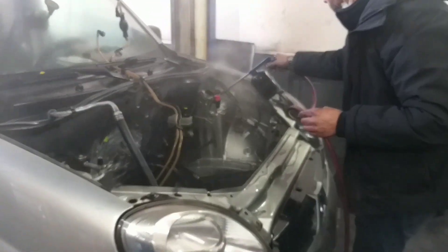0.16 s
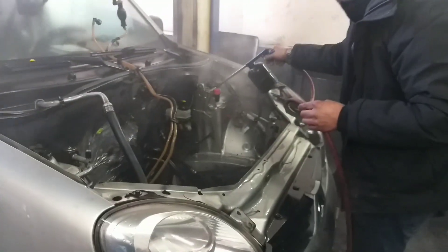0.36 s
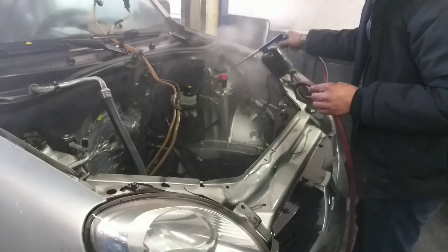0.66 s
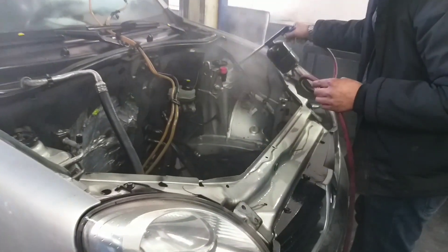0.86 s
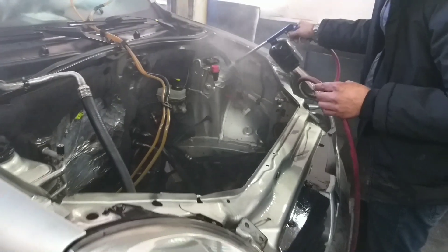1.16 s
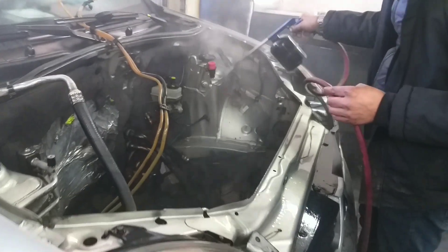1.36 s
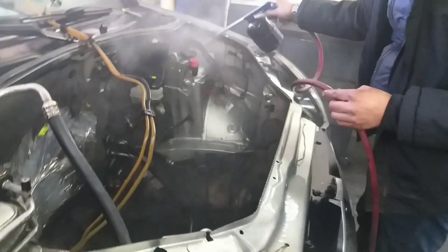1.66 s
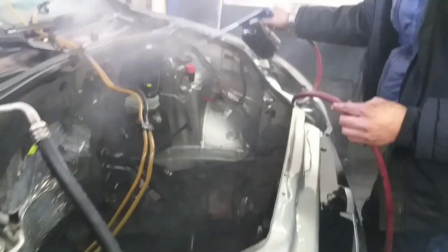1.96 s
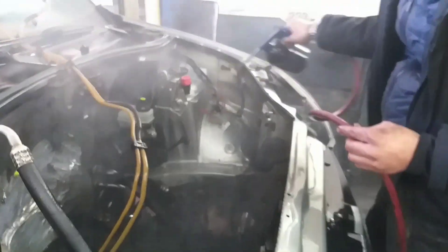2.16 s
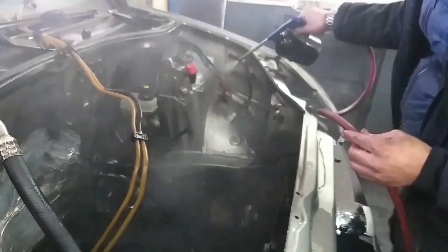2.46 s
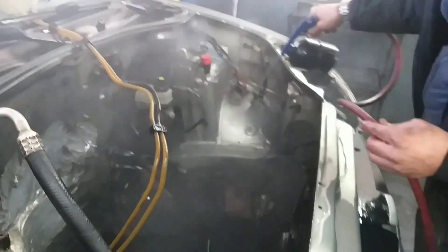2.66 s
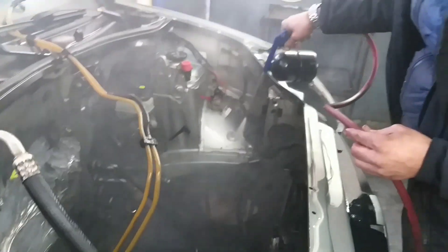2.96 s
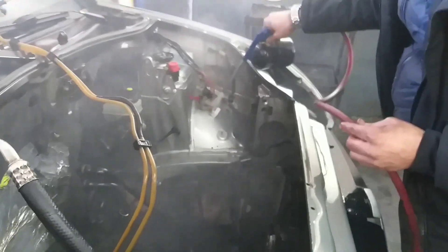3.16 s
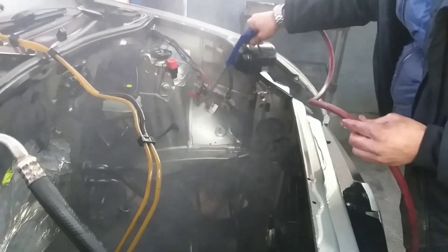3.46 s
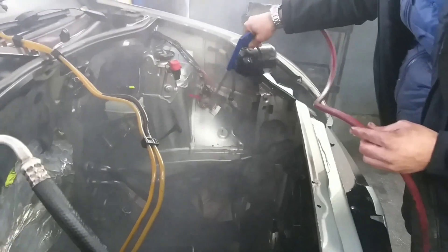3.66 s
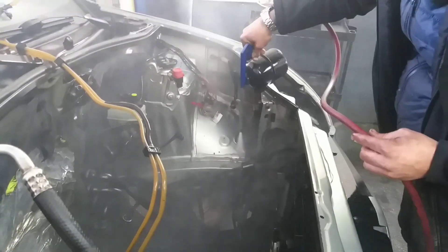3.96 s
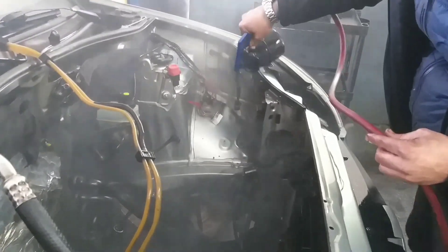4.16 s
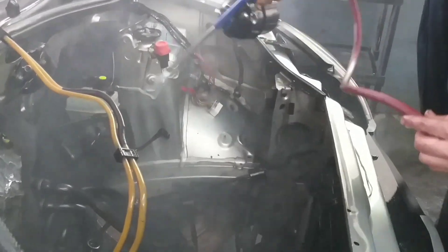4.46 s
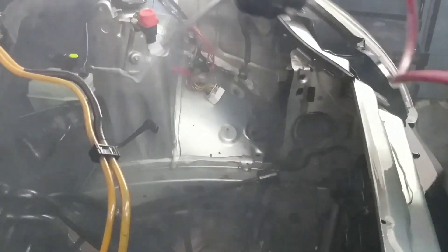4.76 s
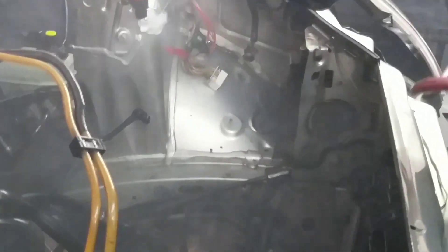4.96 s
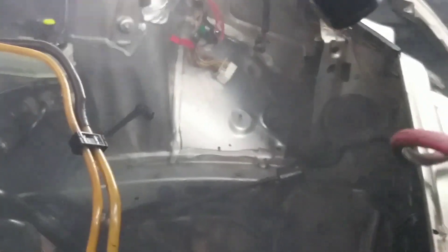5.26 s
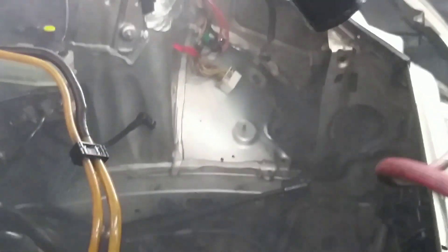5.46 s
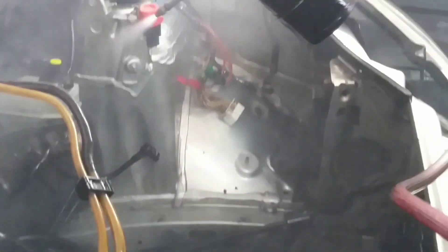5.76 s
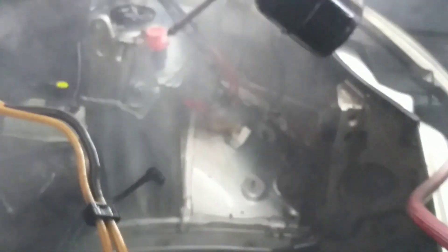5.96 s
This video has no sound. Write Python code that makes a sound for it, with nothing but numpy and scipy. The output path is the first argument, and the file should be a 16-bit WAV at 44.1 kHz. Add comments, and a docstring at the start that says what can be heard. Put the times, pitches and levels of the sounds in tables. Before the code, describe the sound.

The jet is already at full force at 0 s: a loud, dense, high hiss strongest around 9 kHz, with wet sizzling around 4 to 6 kHz, heard close in a garage. From 0.1 to 1.7 s it flickers quickly as spray strikes panels, with short drumming surges, small spurts and faint noisy whistles over edges. Around 2.1 to 2.4 s the hits swell again. From about 2.6 s the gun turns downward; the hiss becomes slightly lower and more peaked, with extra airy mist until 4 s. Drumming pulses near 2.9 to 3.2 s, and a soft hollow rush comes at 4 s. From 4.3 to 5.1 s it eases slightly between spurts, misses and hits. Hollow puffs follow at 5.2 to 5.5 s, then a sizzling surge at 5.6 s. Faint splashing, air rumble and nearly buried motor hum continue underneath; the hiss runs to the end at about 6.1 s.

```python
"""A hot-water washer gun sprays steam into an empty engine bay in a garage, heard close by in near mono.
The nozzle is shaped noise whose peak slides with its aim. The jet's noise and drops sizzle and drum on metal.
Narrow noise bands whistle over edges and a low band rushes into hollows.
Behind it run-off splashes, low air noise rumbles and buffets, and a faint sine motor hum dips and climbs."""
import sys
import numpy as np
from scipy import signal
from scipy.fft import rfft, irfft, next_fast_len
from scipy.io import wavfile
from scipy.ndimage import uniform_filter1d, minimum_filter1d, map_coordinates

SR = 44100
rng = np.random.default_rng(int(sys.argv[2]) if len(sys.argv) > 2 else 0)


def wrap_up_sound(samples):
    """Save the sound to the file named by the first command line argument, as 16-bit audio."""
    columns = np.atleast_2d(samples).T
    # keep every value between -1 and 1, then stretch to whole-number steps
    tamed = np.clip(columns, -1, 1)
    steps = np.round(tamed * 32767).astype(np.int16)
    wavfile.write(sys.argv[1], SR, steps)


N = 269892

# Levels over time come before the trims and flickers that each source adds.
# Spectra give relative level per Hz. Resonance widths are from the centre to -6 dB.

# Slow path of the gun round the bay: [t/s, nozzle hiss level/dB, sizzle level/dB, drumming level/dB]
GUN_SWEEP = [(0, -16, -21.5, -29), (.07, -15.5, -22.5, -30.5), (.16, -14.5, -20, -29),
             (.62, -13.5, -20, -29.5), (.88, -13.5, -20, -33), (1.08, -15, -21.5, -32),
             (1.8, -15, -24, -34), (2.25, -13.7, -22, -34.5), (2.55, -15, -22.5, -36),
             (3.1, -16.5, -21.5, -36.5), (3.7, -16, -19, -35.5), (4.15, -16.5, -22, -36),
             (4.5, -18, -23, -36.5), (4.95, -17.5, -23.5, -36.5), (5.2, -16.5, -23, -32),
             (5.43, -17, -24.5, -34), (5.62, -15, -18, -31), (6.12, -16, -23, -39)]
# Peak of the nozzle spectrum: [t/s, f/Hz]
NOZZLE_PEAK = [(0, 8900), (.45, 8800), (.95, 9260), (1.6, 9150), (2.35, 9070), (2.6, 9000), (2.85, 8530),
               (3.4, 8600), (3.85, 8420), (4.25, 8480), (4.6, 8600), (5.45, 8700), (6.12, 8600)]
# Turning of the gun: [t/s, side-on share 0-1, fine mist level/dB]
GUN_TURN = [(0, 0.47, -36), (.2, 0.77, -28), (1.2, 0.7, -30), (2.3, 0.84, -29), (2.7, 0.4, -23),
            (3.1, 0.24, -23), (3.6, 0.2, -21), (4.2, 0.1, -26), (4.6, 0.15, -27), (5.3, 0.2, -29),
            (5.7, 0.12, -32), (6.12, 0.2, -24)]
# Nozzle hiss with the gun seen side-on: [f/Hz, level/dB]
HISS_SIDE_ON = [(3000, -53), (5500, -4), (6600, -11.5), (8000, -3.5), (8700, -2), (9200, 4.5), (10100, 1.5),
                (11300, 1), (12500, 1), (13800, -3.5), (16000, -11)]
# Nozzle hiss with the gun pointing down into the bay: [f/Hz, level/dB]
HISS_DOWNWARD = [(3000, -66), (5500, -6.5), (6400, -8), (7500, -1), (8100, 2), (8550, 5), (9200, -1),
                 (9900, -15.5), (10700, -11.5), (11700, -4.5), (13500, -3.5), (16000, -7)]
# Finest hiss of the steam: [f/Hz, level/dB]
MIST_SPECTRUM = [(11000, -28), (13500, -2), (14500, 3), (15400, 9), (16000, -8)]
# Gun spits harder and throws a puff of air: [t/s, length/s, change of hiss level/dB]
SPURT_EVENTS = [(.535, 0.054, 2.5), (.79, 0.1, 1), (1.47, .06, 1), (1.76, .05, 1.4), (2.32, .07, 0),
                (3.15, 0.052, 2.5), (3.43, 0.071, 2), (3.86, 0.04, 1), (4.315, 0.045, 2.3),
                (4.47, .05, -0.5), (4.62, 0.046, 0.5), (4.79, 0.046, 2.5), (5.02, 0.042, 1),
                (5.87, 0.084, 2)]
# Jet lands squarely on a panel: [t/s, length/s, change of sizzle level/dB, change of drumming level/dB]
PANEL_HITS = [(.14, 0.047, 3.5, 3.5), (.26, 0.12, 4, 2), (.365, 0.11, 2.5, 3.5), (.555, 0.1, 4.5, 3),
              (.715, 0.053, 0, 4.5), (.96, 0.047, -0.5, 6), (1.045, .04, 2.5, -1.5), (1.215, .09, 3, 6.5),
              (1.425, .06, 3, 7), (1.63, .08, 2.5, 0.5), (2.14, 0.14, 3.5, 4.5), (2.34, .11, 4, 2.5),
              (2.61, 0.082, -1.5, 4.5), (2.77, 0.056, 1.5, 4), (2.905, .06, 2, 7.5), (3.15, 0.065, 0, 7.5),
              (3.235, 0.031, 1, 7), (3.31, .05, 1.5, -1), (4.26, 0.051, 2, 6.5), (4.495, .06, 2, 2.5),
              (4.745, .04, 4.5, 3.5), (4.805, 0.045, 4, 6), (5.025, .07, 3.5, 1.5),
              (5.68, 0.088, 1.5, -2.5), (5.8, .05, -0.5, 0), (6.075, 0.065, 4, 3)]
# Jet slips past the metal into a gap: [t/s, length/s, drop of impact level/dB]
GAP_MISSES = [(.46, 0.054, 0), (.85, 0.076, 3), (1.33, .08, 2), (1.49, .03, -1), (4.4, 0.049, 4.5),
              (4.555, .03, 1), (4.69, 0.049, 3.5), (4.93, .09, 2.5), (5.99, 0.037, 0)]
# Sizzle of the jet sweeping across the bay: [f/Hz, level/dB]
SIZZLE_SWEEPING = [(1500, -45), (2900, -13.5), (3350, -8), (3750, -15.5), (4150, 1), (4600, -1.5),
                   (5000, 1.5), (5400, 0.5), (5850, -1), (6300, -4), (7200, -6), (10000, -39)]
# Sizzle of the jet pointing down into the bay: [f/Hz, level/dB]
SIZZLE_DOWNWARD = [(1500, -35), (3000, -24.5), (3400, -7), (3800, -2), (4250, -1.5), (4600, 1.5),
                   (5000, -1), (5400, -1), (5850, -4), (6250, -10), (7200, -6), (10000, -30)]
# Panel resonances: [f/Hz, width/Hz, level/dB]
PANEL_MODES = [(1020, 250, -16), (1700, 430, -4.5), (2024, 460, -1), (2603, 270, 2), (3030, 300, 1),
               (3430, 330, 3.5), (4110, 570, 3.5)]
# Jet sings over an edge or a hole: [t/s, length/s, f/Hz, full width at -6 dB/Hz, level/dB]
EDGE_WHISTLES = [(0.195, .035, 5050, 350, -24), (0.257, .03, 4100, 600, -24), (0.383, 0.02, 5800, 650, -18),
                 (.42, .06, 11300, 400, -27), (0.45, 0.035, 5050, 260, -26), (0.544, 0.039, 4350, 500, -22),
                 (0.576, .025, 5240, 400, -22), (.70, 0.042, 5540, 450, -22),
                 (0.706, 0.041, 6900, 700, -24), (1.195, 0.024, 5000, 350, -19),
                 (1.87, .07, 13300, 400, -29), (2.075, .025, 5080, 350, -21.5),
                 (2.144, 0.038, 5970, 900, -26), (2.15, 0.045, 3630, 600, -28), (3.47, .08, 7750, 350, -27),
                 (3.62, .05, 10100, 350, -30), (3.732, .07, 7490, 350, -24.5),
                 (4.783, 0.042, 4450, 380, -23), (4.793, .05, 11500, 600, -28),
                 (5.019, .035, 3830, 480, -26)]
# Jet dips into a hollow of the body: [t/s, length/s, level/dB]
HOLLOW_DIPS = [(0.07, 0.066, -36), (0.532, 0.037, -31), (4.02, 0.15, -32.5), (4.245, 0.11, -41.5),
               (5.168, 0.045, -34.5), (5.279, 0.087, -40.5), (5.41, 0.042, -34), (5.463, 0.047, -30)]
# Resonances of the hollows: [f/Hz, width/Hz, level/dB]
CAVITY_MODES = [(680, 83, -2.5), (786, 150, -5.5), (1010, 100, 2), (1200, 160, -1), (1760, 350, -0.5)]
# Draught and run-off over time: [t/s, air rumble level/dB, splashing level/dB]
DRAUGHT_AND_RUNOFF = [(0, -55, -34.5), (.17, -45, -38.5), (.78, -43.5, -37), (1.12, -46.5, -41.5),
                      (2.35, -44, -39), (2.9, -48, -42), (3.3, -52.5, -44), (3.75, -48.5, -48),
                      (4.0, -47.5, -39), (4.23, -54.5, -44), (4.5, -48, -44), (5.1, -53, -45.5),
                      (5.4, -51, -40), (5.85, -49, -44), (6.12, -45, -44)]
# Rumble of the stirred air: [f/Hz, level/dB]
RUMBLE_SPECTRUM = [(40, -45), (70, -11), (105, -3), (150, -3.5), (250, -1), (400, -3.5), (700, -14.5),
                   (1500, -52)]
# Deep buffeting of the air: [f/Hz, level/dB]
BUFFET_SPECTRUM = [(10, -40), (25, -14), (35, -6), (50, 1), (80, 4), (120, -3), (200, -28)]
# Splashing run-off water: [f/Hz, level/dB]
SPLASH_SPECTRUM = [(150, -29), (400, -6.5), (700, 0), (1050, 1.5), (1400, -1), (2200, -1.5), (4000, -39)]
# Motor hum: [t/s, f/Hz, level/dB]
MOTOR_HUM = [(0, 110, -63), (2.4, 104.7, -61), (2.85, 112, -58), (3.4, 110, -69), (3.72, 103, -53),
             (3.88, 92.6, -66), (4.45, 100, -62), (4.85, 109, -57.5), (5.2, 115, -50), (5.53, 121, -53),
             (5.68, 122, -70), (6.12, 120, -69)]
# Two resonances, leaning left and right, that open up the stereo image: [f/Hz, width/Hz, level/dB]
STEREO_MODES = [(1870, 98, -19), (9270, 220, -8.5)]

HISS_PER_SIZZLE, SPLASH_PER_DRUM = 0.2, 0.14  # dB gained by hiss and splashing per dB of impact
AIR_PER_SPURT = 1.9  # dB of rumble per dB of spurt
BUFFET_DB, BUFFET_AT_DB = -63.5, -47.5  # buffet level, and the rumble curve's level where it applies
BUFFET_GROWS = 1.85  # dB of buffet per dB of rumble
MIST_PATCHY_DB = 2  # unevenness of the finest hiss
DROPS_PER_S, DROP_SPREAD_DB = 1500, 2  # drops in the jet and their scatter in strength
SPUTTER_PER_S = 80  # random knots a second in the jet's flicker
TOP_HZ = 15780  # nothing is left from here up


def amp(db):
    """Decibels to gain."""
    return 10 ** (np.asarray(db) / 20)


def unit(x):
    """Scale to rms 1."""
    return x / np.sqrt(np.mean(x ** 2) + 1e-20)


def clock():
    """The time of every sample in seconds."""
    return np.arange(N) / SR


def curves(rows):
    """One value per sample for each column after the time."""
    s, *cols = np.transpose(rows)
    return [np.interp(clock(), s, col) for col in cols]


def swell(s, length):
    """A smooth bell-shaped rise and fall around time s."""
    return np.exp(-2 * ((clock() - s) / length) ** 2)


def passes(rows):
    """For each dB column after time and length, the sum of round-shouldered plateaus."""
    s, length, *cols = np.transpose(rows)
    offset = 2 * (clock() - s[:, None]) / length[:, None]
    shapes = 1 / (1 + offset ** 4)  # length spans the half-height points
    return [db @ shapes for db in cols]


def wobble(rate):
    """A smooth random curve, rate knots a second."""
    knots = rng.standard_normal(int(N * rate / SR) + 4)
    return map_coordinates(knots, [clock() * rate])


def colour(points):
    """The response through (Hz, dB) points on a log frequency axis."""
    f, db = np.transpose(points)
    return lambda hz: amp(np.interp(np.log(hz + 1), np.log(f), db))


def resonances(modes):
    """The response of (Hz, width, dB) modes with steep skirts, summed in power."""
    return lambda hz: np.sqrt(sum(amp(db) ** 2 / (1 + ((hz - c) / w) ** 2) ** 2 for c, w, db in modes))


def filtered(x, response):
    """x shaped by a response over frequency."""
    m = next_fast_len(N + SR // 4)
    return irfft(rfft(x, m) * response(np.fft.rfftfreq(m, 1 / SR)), m)[..., :N]


def turbulence(patchy_db, patch_hz=300, patch_s=.06):
    """White noise whose strength varies in patches of time and frequency."""
    hz, t, z = signal.stft(rng.standard_normal(N), SR, nperseg=1024)
    rows, cols = np.meshgrid(hz / patch_hz, t / patch_s, indexing="ij")
    patches = map_coordinates(rng.standard_normal((400, 420)), [rows, cols], order=1)
    return signal.istft(z * amp(patchy_db * unit(patches)), nperseg=1024)[1][:N]


def drops(rate, spread_db):
    """Random clicks of either sign, mostly weak and a few strong."""
    falls = rng.random(N) < rate / SR
    size = np.minimum(rng.standard_exponential(N), 5)
    return unit(falls * amp(spread_db * size) * rng.choice([-1, 1], N))


def aimed(spectrum, peak_hz):
    """Nozzle noise whose spectrum slides so that its highest point sits at peak_hz."""
    noise = turbulence(patchy_db=1.5, patch_hz=260, patch_s=.06)
    hz, t, z = signal.stft(noise, SR, nperseg=512)
    own_peak_hz = max(spectrum, key=lambda point: point[1])[0]
    slide = own_peak_hz / np.interp(t, clock(), peak_hz)
    shaped = z * colour(spectrum)(hz[:, None] * slide)
    return unit(signal.istft(shaped, nperseg=512)[1][:N])


def nozzle(hiss_db):
    """Escaping steam hisses; turning the gun crossfades two colours, slides their peak and varies the mist."""
    peak_hz, = curves(NOZZLE_PEAK)
    share, mist_db = curves(GUN_TURN)
    share = np.clip(share, 0, 1)
    side_on = np.sqrt(share) * aimed(HISS_SIDE_ON, peak_hz)
    downward = np.sqrt(1 - share) * aimed(HISS_DOWNWARD, peak_hz)
    mist = unit(filtered(turbulence(patchy_db=MIST_PATCHY_DB), colour(MIST_SPECTRUM)))
    hiss_gain = amp(hiss_db - 0.04 + 0.53 * wobble(70))
    return hiss_gain * (side_on + downward) + amp(mist_db + 1.5) * mist


def impact(sizzle_db, drum_db):
    """The sputtering jet and its drops excite sheet metal: a bright sizzle and resonant panel drumming."""
    share = np.clip(curves(GUN_TURN)[0], 0, 1)
    sputter = wobble(SPUTTER_PER_S)
    patter = drops(rate=DROPS_PER_S, spread_db=DROP_SPREAD_DB)
    spray = turbulence(patchy_db=2.0, patch_hz=256, patch_s=.035) + 0.54 * patter
    across = unit(filtered(spray, colour(SIZZLE_SWEEPING)))
    down = unit(filtered(spray, colour(SIZZLE_DOWNWARD)))
    sizzle = share * across + (1 - share) * down
    pressure = turbulence(patchy_db=2.0, patch_hz=180.8, patch_s=0.066) + .5 * patter
    drum = unit(filtered(pressure, resonances(PANEL_MODES)))
    sizzle_gain = amp(sizzle_db + 0.5 + 1.0 * sputter)
    drum_gain = amp(drum_db + 3.5 + 0.52 * sputter)
    return sizzle_gain * sizzle + drum_gain * drum


def edges():
    """Brief narrow bands of noise whistle where the jet is split by an edge."""
    flow = rng.standard_normal(N)
    whistles = np.zeros(N)
    for s, length, hz, width, db in EDGE_WHISTLES:
        tone = unit(filtered(flow, resonances([(hz, width / 2, 0)])))
        whistles += amp(db + 4.0) * swell(s, length) * tone
    return whistles


def hollows():
    """Turbulence excites cavity resonances: a low rush each time the jet blows into a recess."""
    blow = sum(amp(db) * swell(s, length) for s, length, db in HOLLOW_DIPS)
    rush = filtered(turbulence(patchy_db=3.0, patch_hz=108), resonances(CAVITY_MODES))
    return blow * unit(rush)


def air(rumble_db):
    """Stirred air rumbles, and buffets more steeply the stronger it blows; also returns its gust curve."""
    gust = wobble(25)
    rumble = unit(filtered(rng.standard_normal(N), colour(RUMBLE_SPECTRUM)))
    buffet = unit(filtered(rng.standard_normal(N), colour(BUFFET_SPECTRUM)))
    buffet_db = BUFFET_DB + BUFFET_GROWS * (rumble_db - BUFFET_AT_DB)
    rumble_gain = amp(rumble_db + 1.2 + 2.0 * gust)
    return rumble_gain * rumble + amp(buffet_db + 4.3 * wobble(16)) * buffet, gust


def splashing(splash_db, gust):
    """Run-off water splashes down as patchy noise and sparse drops, its level swaying with the gusts."""
    water = turbulence(patchy_db=3.0, patch_hz=127) + 0.66 * drops(rate=250, spread_db=4)
    splash = unit(filtered(water, colour(SPLASH_SPECTRUM)))
    return amp(splash_db + 2.3 + 1.0 * gust) * splash


def motor():
    """A distant motor hums as one sine with drifting speed."""
    hz, db = curves(MOTOR_HUM)
    hum = np.sin(2 * np.pi * np.cumsum(hz) / SR)
    return amp(db + 1.1 * wobble(8)) * unit(hum)


def bay(x, echo_db, longest_s, drift_s, count=12):
    """Metal walls return short echoes; their drifting delays send fine ripples wandering through the hiss."""
    gain, sound = amp(echo_db), x
    for delay in rng.uniform(longest_s / 10, longest_s, count):
        path_s = delay + drift_s * wobble(2)
        sound = sound + gain * map_coordinates(x, [(clock() - path_s) * SR], order=2)
    return sound / np.sqrt(1 + count * gain ** 2)


def stereo(mid):
    """Near mono: two resonances of opposite sign form a side signal, tilting level and phase between channels."""
    def mode(hz, centre, width, db):
        return amp(db) / (1 + 1j * (hz - centre) / width) ** 2
    left, right = STEREO_MODES
    side = filtered(mid, lambda hz: mode(hz, *left) - mode(hz, *right))
    return np.array([mid + side, mid - side])


def scene():
    """Hits, misses and spurts ride on the gun's slow sweep; the jet echoes in the bay over air, water and motor."""
    hiss_db, sizzle_db, drum_db = curves(GUN_SWEEP)
    rumble_db, splash_db = curves(DRAUGHT_AND_RUNOFF)
    miss, = passes(GAP_MISSES)
    spurt, = passes(SPURT_EVENTS)
    sizzle_rise, drum_rise = passes(PANEL_HITS) - miss
    jet = nozzle(hiss_db + spurt + HISS_PER_SIZZLE * sizzle_rise)
    jet = jet + impact(sizzle_db + sizzle_rise, drum_db + drum_rise) + edges()
    moving_air, gust = air(rumble_db + AIR_PER_SPURT * spurt)
    around = moving_air + splashing(splash_db + SPLASH_PER_DRUM * drum_rise, gust)
    in_bay = bay(jet, echo_db=-21, longest_s=.012, drift_s=.0001)
    return stereo(in_bay + hollows() + around + motor())


def record(dry):
    """A quick limiter eases the highest peaks; then the lowest bass is cut and all from TOP_HZ up removed."""
    needed = 1 / np.maximum(np.abs(dry).max(axis=0) / .97, 1)
    gain = uniform_filter1d(minimum_filter1d(needed, size=121), size=101)  # sizes in samples
    bass_cut = colour([(15, -24), (30, -8), (60, 0)])
    return filtered(dry * gain, lambda hz: bass_cut(hz) * (hz < TOP_HZ))


dry = scene()
out = record(dry)
wrap_up_sound(out)
```